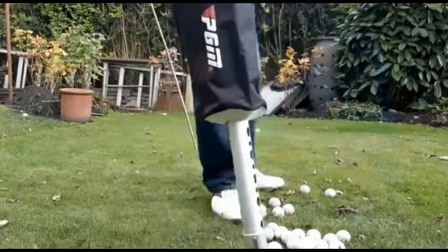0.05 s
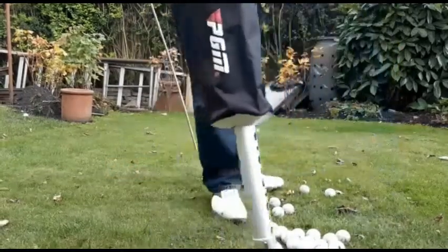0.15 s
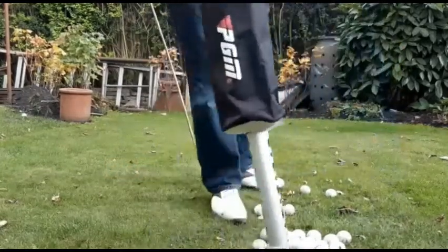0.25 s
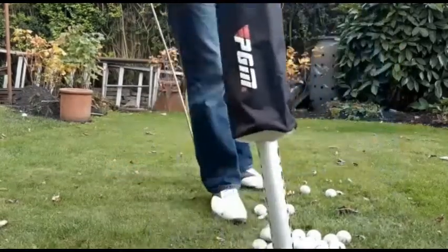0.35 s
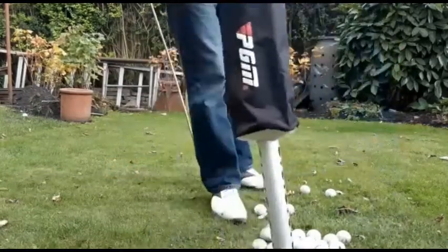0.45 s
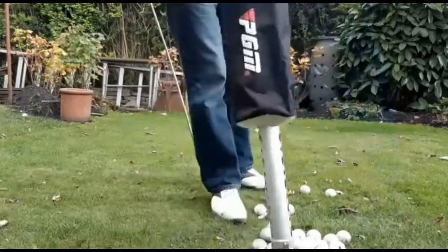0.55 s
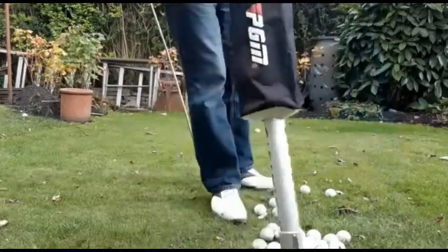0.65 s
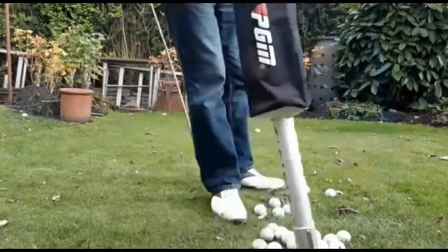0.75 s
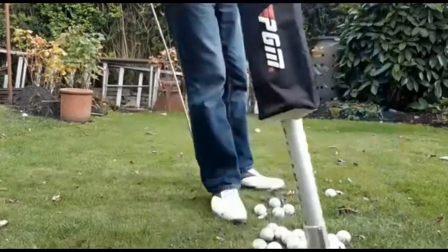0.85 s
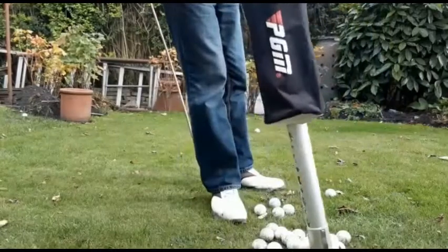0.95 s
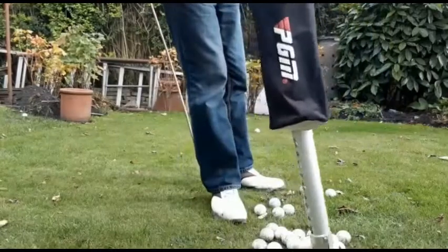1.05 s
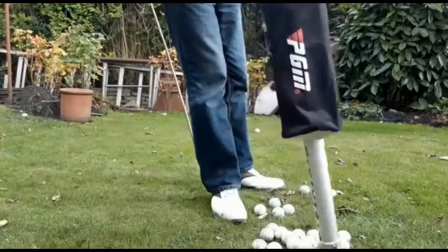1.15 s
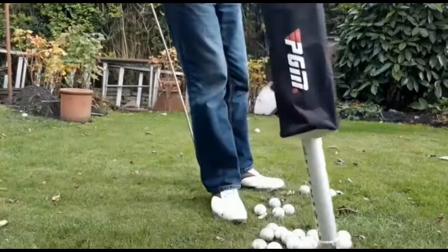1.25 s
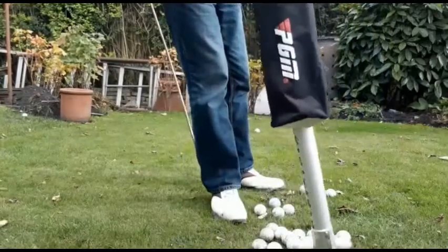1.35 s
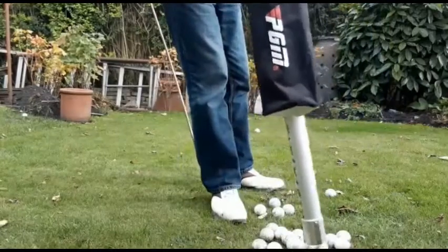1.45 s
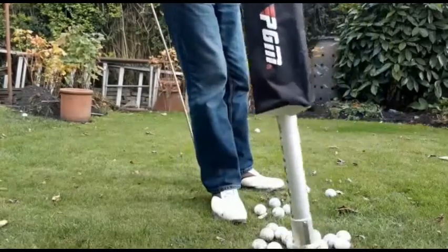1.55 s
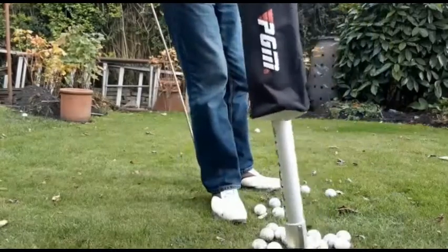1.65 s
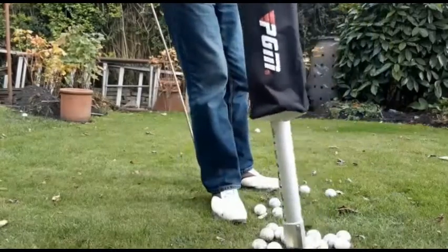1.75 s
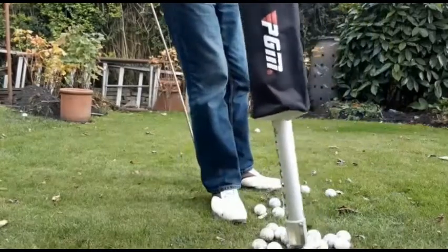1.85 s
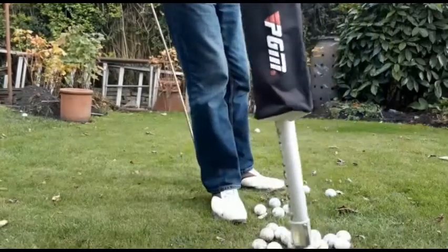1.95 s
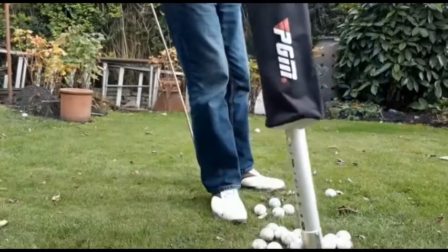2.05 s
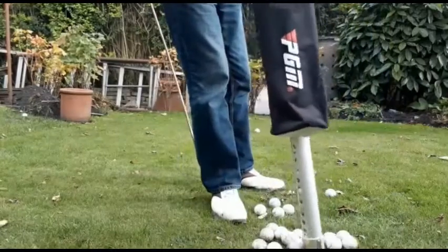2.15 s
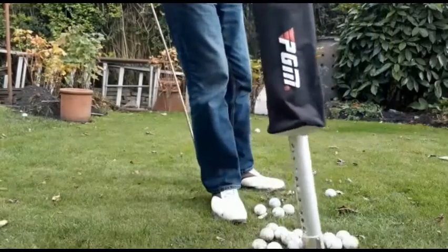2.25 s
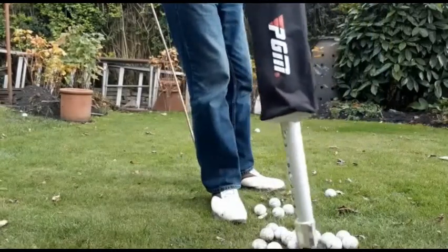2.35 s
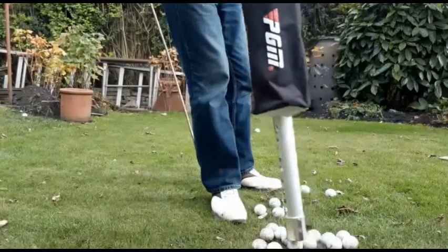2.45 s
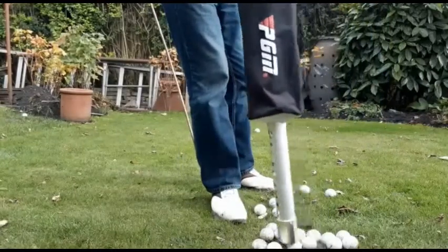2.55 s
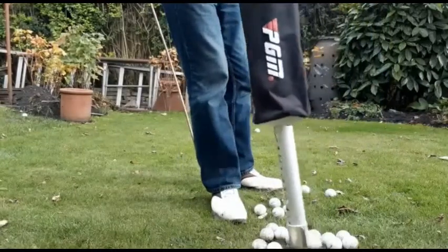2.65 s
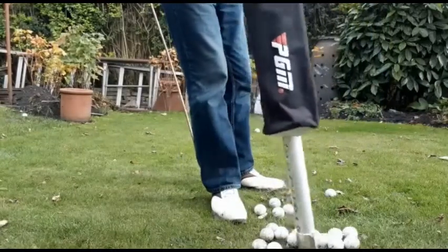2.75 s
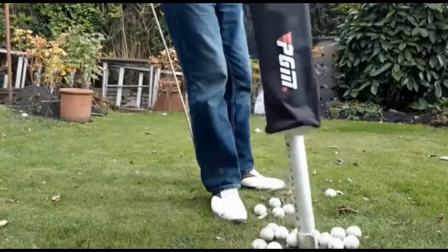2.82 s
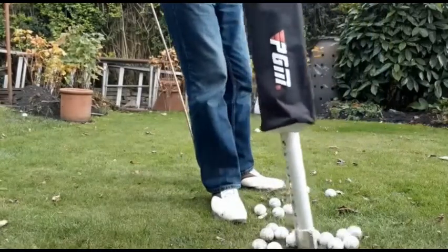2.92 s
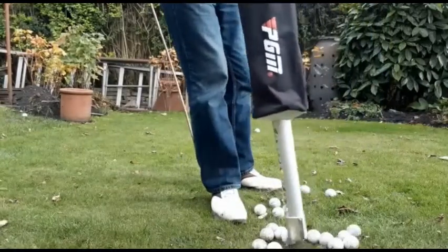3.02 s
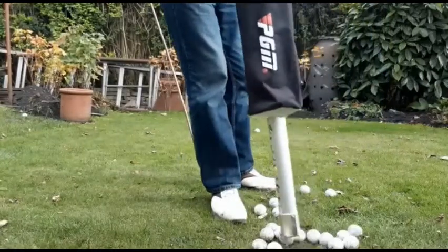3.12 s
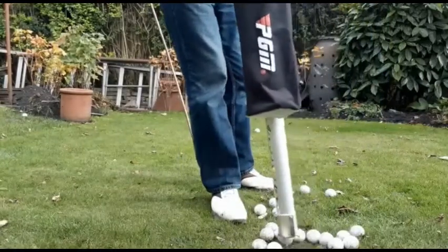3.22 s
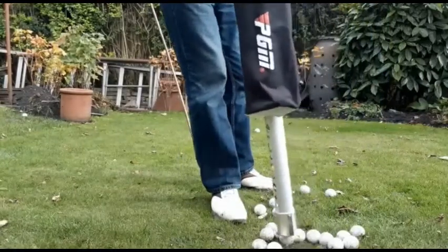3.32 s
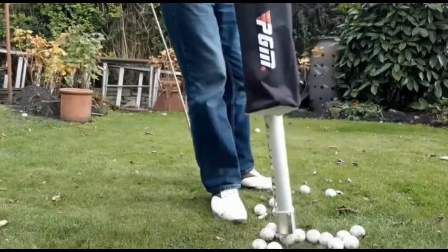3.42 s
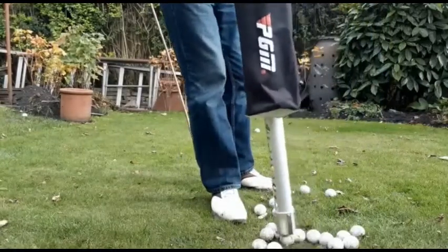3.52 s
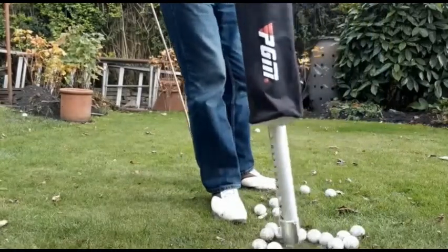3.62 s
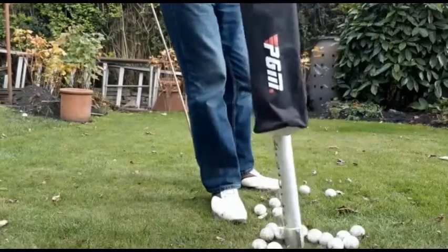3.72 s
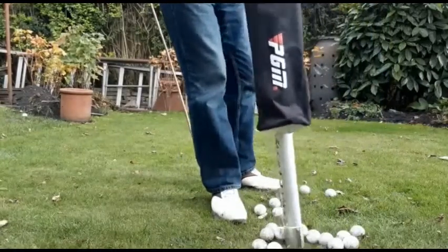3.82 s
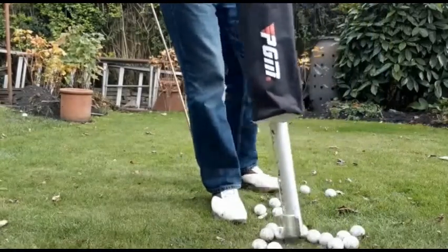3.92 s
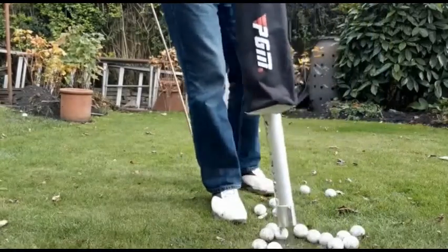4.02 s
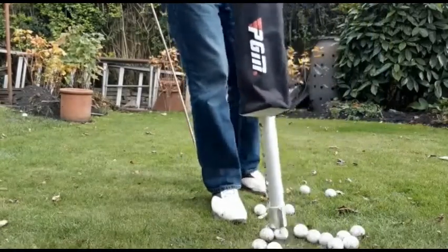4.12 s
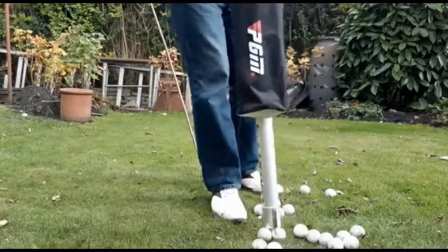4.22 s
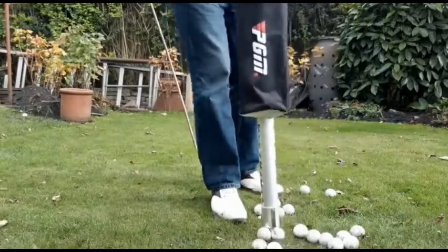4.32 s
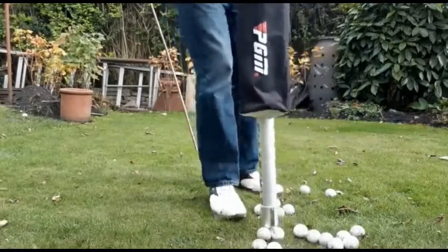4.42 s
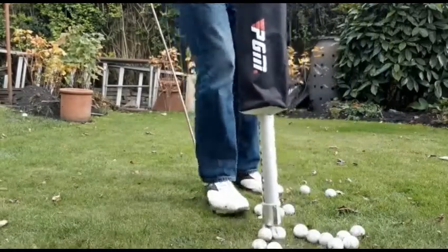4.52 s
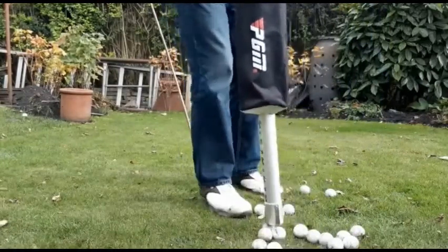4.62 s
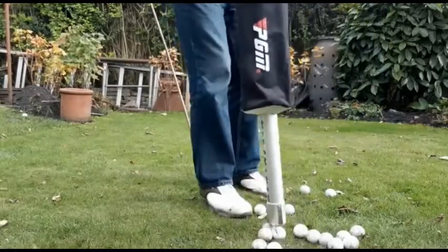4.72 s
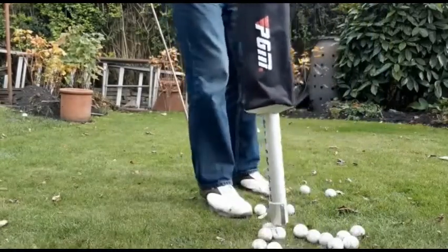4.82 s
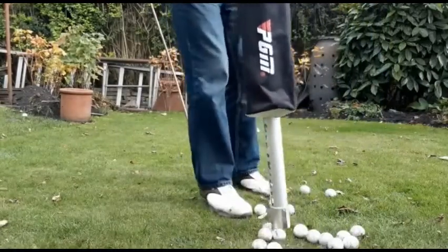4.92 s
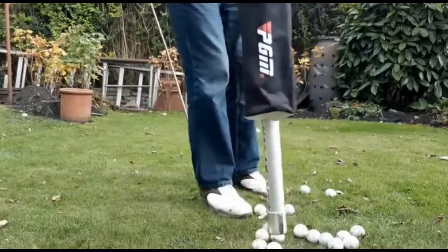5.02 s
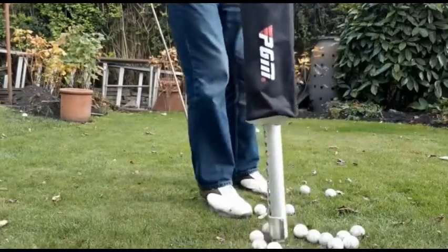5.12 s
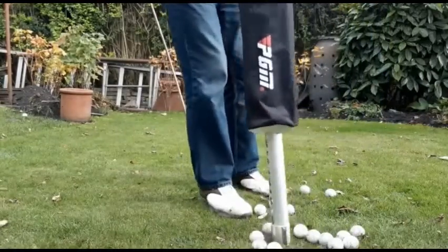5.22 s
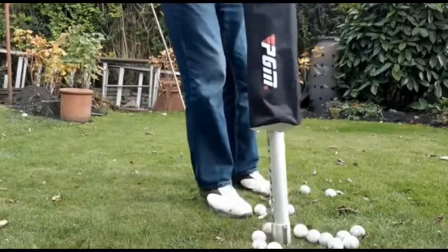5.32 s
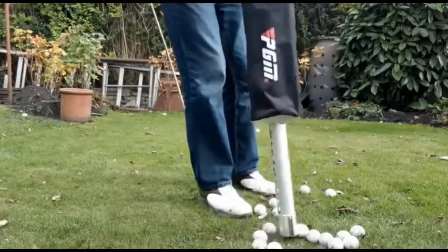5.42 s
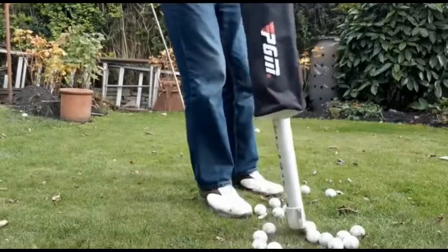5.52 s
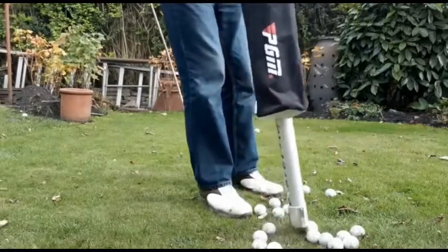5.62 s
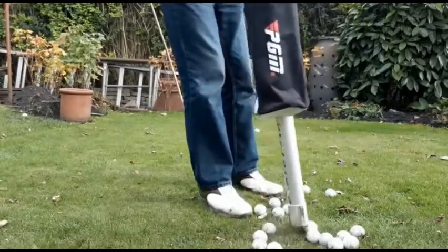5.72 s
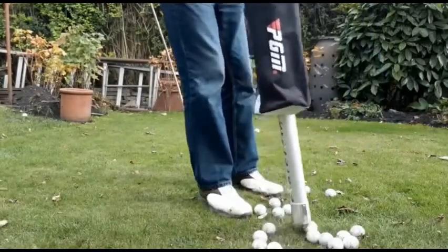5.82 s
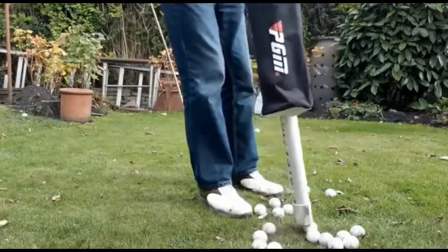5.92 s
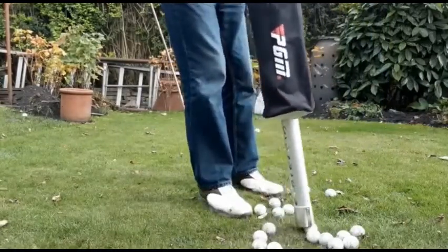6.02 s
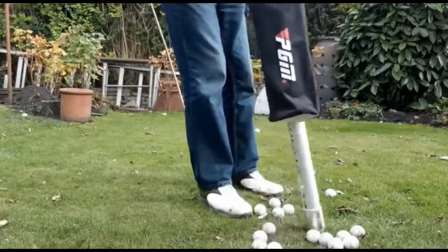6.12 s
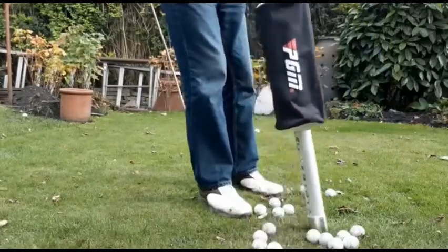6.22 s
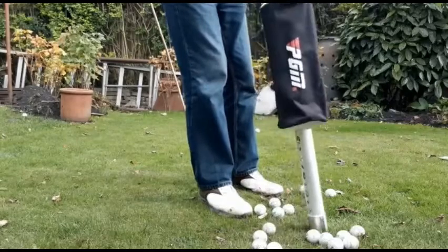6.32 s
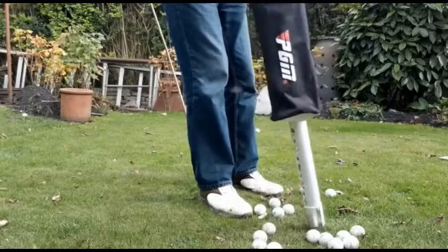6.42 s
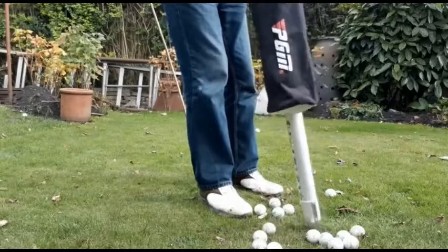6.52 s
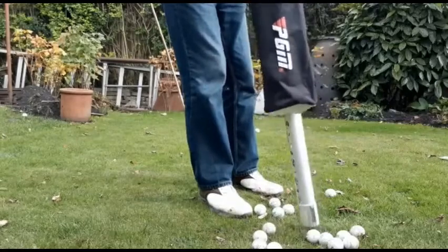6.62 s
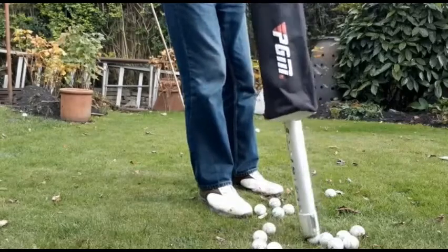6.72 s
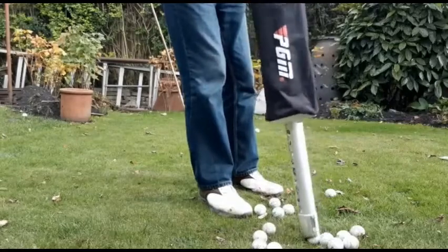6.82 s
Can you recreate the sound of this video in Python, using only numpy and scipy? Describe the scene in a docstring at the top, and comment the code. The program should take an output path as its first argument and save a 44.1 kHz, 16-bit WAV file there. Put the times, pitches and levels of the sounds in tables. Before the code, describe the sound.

Golf balls clack and scrape one after another into a thin metal tube pressed down on a lawn, over faint rumble, hum and hiss.

```python
"""Picking up golf balls with a tube

A thin metal tube is pressed over golf balls on a lawn, a few steps from a camera with two microphone ports.
Each ball knocks the rim, scrapes past spring clips, snaps in and rattles the stack above; the wall rings.
Knocks are short noise bursts with decaying tones; scrapes are ticks and rubbing through shared resonances.
Soft turf thuds and a garden echo join in. Far traffic, a low mains-like hum and garden hiss lie underneath.
"""
import sys
import numpy as np
from scipy import signal
from scipy.fft import rfft, irfft, next_fast_len
from scipy.io import wavfile
from scipy.ndimage import uniform_filter1d, map_coordinates

SR = 44100
rng = np.random.default_rng(int(sys.argv[2]) if len(sys.argv) > 2 else 0)


def put_to_file(sound):
    """Save the sound as 16-bit audio at rate SR, in the file named by the first command-line argument."""
    columns = np.atleast_2d(sound).T  # one column per channel
    safe = np.clip(columns, -1, 1)
    whole_steps = np.round(safe * 32767)
    wavfile.write(sys.argv[1], SR, whole_steps.astype(np.int16))


N = 302517  # length in samples

# Background levels. Each row: time in seconds, then relative levels of rumble, murmur and hiss in dB.
AIR_LEVELS = [(0, -56, -56, -78.5), (.8, -56.5, -58.5, -75), (1.9, -60.5, -56.5, -81),
              (2.5, -51.5, -57.5, -76.5), (3.1, -57.5, -60.5, -78), (3.5, -58, -63.5, -83),
              (4, -51, -59.5, -75), (4.5, -57.5, -58.5, -75.5), (4.95, -51.5, -61, -79),
              (5.6, -58, -58, -73), (5.95, -50, -61, -73), (6.45, -50, -56.5, -67.5),
              (6.86, -47.5, -66, -75)]
# Colours of the three background noises. Each row: frequency in Hz, relative level in dB.
RUMBLE_COLOUR = [(12, -42.5), (20, -20.5), (46, -1), (87, -1), (123, -3.5), (203, -12), (228, -15.5),
                 (400, -29), (520, -58.5), (880, -120)]
MURMUR_COLOUR = [(130, -29), (220, -9), (286, -0.5), (429, -13.5), (458, -12), (872, -8), (1030, -11),
                 (1630, -13), (3000, -37.5), (3900, -60.5), (6600, -120)]
HISS_COLOUR = [(1290, -34), (2200, -8), (2930, -6.5), (3640, -5.5), (3920, -6.5), (7350, -9), (9380, -17.5),
               (15100, -20), (16300, -10.5)]
# How alike the background is left and right. Each row: frequency in Hz, likeness from -1 to 1.
STEREO_LIKENESS = [(30, .22), (60, .4), (110, .7), (200, 0.92), (330, .7), (640, -0.35), (1400, -.5),
                   (3100, 0.093), (7000, -0.21), (15000, -0.033)]
# The upper hum line before its wobble. Each row: time in seconds, level in dB.
UPPER_HUM = [(0, -53.5), (.7, -59.5), (1.4, -59), (1.7, -73), (2.2, -52), (2.9, -58), (3.5, -70.5),
             (5.6, -60.5), (6.86, -69)]
# How long the garden echoes. Each row: frequency in Hz, time to fade by 60 dB in seconds.
GARDEN_FADE = [(200, 0.25), (2000, 0.12), (10000, 0.18)]
# The tube's foot landing on turf. Each row: start in seconds, level in dB, pitch in Hz,
# time to fade by 60 dB in seconds.
TURF_THUDS = [(.378, -28, 116, 0.18), (1.161, -26, 95, 0.12), (2.133, -28.5, 90, 0.11),
              (3.755, -25.5, 86.6, .09), (5.224, -23.5, 105.2, 0.134), (6.215, -29, 89, 0.099),
              (6.529, -16.5, 101.4, 0.057)]
# Knocks of ball on rim, clip or ball. Each row: start in seconds, relative level in dB, clack pitch in Hz,
# low body within the knock in dB, hardness in dB (harder is brighter).
BALL_KNOCKS = [(.123, -35, 1540, 1.5, -5), (0.186, -34.5, 1430, 6, 14.5), (.224, -23.5, 1465, -24, 7.5),
               (.252, -19, 1170, -7, -1), (0.281, -25.5, 1025, -25, -5), (.361, -16.5, 1150, -34, 0.5),
               (.367, -13.5, 1043, -32, 7.5), (.392, -20, 1114, -14, -7.5), (.429, -26, 1045, -21, -3),
               (0.488, -38, 1340, -21, -11.5), (.58, -44, 1500, -11, 3.5), (.969, -42.5, 1323, -3.5, -5.5),
               (.986, -40, 1500, 8.5, 0), (1.058, -22, 1358, -28, -7.5), (1.074, -20, 1500, -29, -6),
               (1.084, -15, 1039, -6, -4), (1.127, -16, 1562, -8, 6), (1.138, -12.5, 1100, -7, 16.5),
               (1.146, -7, 3200, -8, 9), (1.346, -41.5, 1047, -19.5, -1.5),
               (1.699, -43.5, 1420, -15.5, -11.5), (1.834, -38.5, 812, -4.5, -10.5),
               (2.026, -28.5, 4030, -25, -15), (2.042, -24, 1570, -18, -2), (2.061, -16, 1610, -18, 7.5),
               (2.081, -18, 1647, -16, -2), (2.108, -25.5, 1357, 5.5, 3.5), (2.122, -13, 1018, -7, 13),
               (2.202, -33.5, 1098, 1, -1.5), (2.559, -36, 1396, 8.5, 1.5), (2.571, -27.5, 1539, 5, 6),
               (2.641, -38, 1540, -3, 6.5), (2.678, -20, 2970, -20, 7), (2.685, -13.5, 2745, -27, 16),
               (2.741, -15, 1605, -28, 2), (2.756, -19.5, 998, -17, 23.5), (2.844, -23.5, 1530, -5.5, -9.5),
               (2.88, -34.5, 1060, -21, 0), (2.923, -48.5, 1510, -21, -9), (2.98, -37.5, 1084, -3, -7.5),
               (3.068, -46.5, 1450, 4, -2.5), (3.561, -43, 1458, -8, 6), (3.588, -29.5, 1580, -21, -14),
               (3.612, -17, 1476, -10.5, -4.5), (3.637, -21, 1253, -26, 3), (3.654, -17, 1660, -30, -3),
               (3.712, -20, 1355, -20, 3.5), (3.738, -13, 1000, -13, -3), (3.764, -6, 1334, -7.5, -11),
               (3.95, -41.5, 1709, -0.5, -19.5), (4.157, -33, 1284, -21, -10), (4.162, -36, 1475, 2.5, -3),
               (4.385, -35, 1286, -7.5, -12), (4.498, -41.5, 890, -18, -22.5), (4.554, -41, 1120, 3, -8.5),
               (5.017, -28, 1406, -3.5, 1), (5.089, -32.5, 1530, -3, 3), (5.122, -22, 1610, -3, -3.5),
               (5.179, -31, 2835, 9, 0.5), (5.212, -14, 1614, -10, -2), (5.228, -13.5, 2900, -5, 0),
               (5.248, -17, 1100, -4.5, 0), (5.322, -33.5, 1470, -15, -1), (5.401, -40.5, 3470, -10, 1.5),
               (5.448, -32.5, 1350, -6, 2.5), (6.114, -30, 2926, -27, -6), (6.125, -35.5, 2816, -13, -8),
               (6.157, -26, 1580, -14, 0), (6.183, -16, 3040, -4, -4), (6.204, -10, 1635, -5, -5),
               (6.289, -27.5, 2820, 4.5, -2), (6.465, -40.5, 1570, -1, -5), (6.529, -17, 2700, -10, 8),
               (6.562, -31, 1110, -22, 4), (6.636, -50, 810, -17, 6), (6.677, -42, 1140, -2, -6),
               (6.717, -21, 1257, -8.5, -11.5), (6.754, -25, 3460, -10, -3.5), (6.778, -23, 1520, -2.5, 3),
               (6.806, -27, 1590, -25, 6), (6.851, -28.5, 1367, -2, 2.5)]
# Presses over a ball. Each row: first touch in seconds, ball grips the clips in seconds, relative slide
# level in dB, snap in seconds, relative snap level in dB, fade in dB per second, relative treble in dB.
BALL_PRESSES = [(0.177, 0.229, -33, 0.37, -15.5, 190, -15), (0.97, 1.064, -33, 1.132, -17, 169.5, -14),
                (2.02, 2.045, -28.5, 2.111, -19.5, 190, -20),
                (2.561, 2.684, -27, 2.755, -18.5, 150.5, -13.5), (3.558, 3.613, -30, 3.742, -19, 202, -16),
                (4.993, 5.097, -34, 5.22, -15.5, 200, -18.5),
                (6.088, 6.125, -35.5, 6.207, -13.5, 201.5, -17),
                (6.528, 6.527, -36.5, 6.55, -32.5, 200, -17.5), (6.719, 6.73, -37.5, 6.8, -33.5, 60, -16.5)]
# Damped resonances of balls, clips and the air in the tube, from low to high.
# Each row: frequency in Hz, width in Hz, relative level in dB.
LOW_RESONANCES = [(270, 130, -3), (416, 77, 2.5), (534, 183, -0.5)]
MIDDLE_RESONANCES = [(1050, 170, 0), (1340, 170, -3), (1580, 150, 0)]
UPPER_RESONANCES = [(2150, 450, -7), (2900, 330, 0), (3550, 260, -3), (4150, 500, -3)]
TREBLE_RESONANCES = [(5050, 3000, -3), (7500, 1900, 1), (9260, 2000, -7), (13100, 3300, -5)]
# Two families of tube wall modes, long-lasting and bright; a knock wakes them at different strengths.
# Each row: frequency in Hz, relative level in dB, undamped time to fade by 60 dB in seconds.
LONG_MODES = [(1039, 0, .22), (1351, -13, .2), (1570, -13, .15), (5203, -15, .26)]
BRIGHT_MODES = [(2810, 0, .17), (2950, 1, .14), (3085, -6, .15), (3548, -12, .08)]
# How far the left port leads the right. Each row: frequency in Hz, lead in radians.
PORT_LEADS = [(100, 1.5), (1000, -0.6), (3000, -0.85), (5500, -1.5), (16000, -1.7)]

HUM_HZ, HUM_CLIMB_HZ_PER_S, LOWER_LINE_DB = 196.8, .9, -59.5  # centres of the hum's wobbles
ECHO_FROM_HZ = 700  # the garden returns little bass
FIRST_BALL_S = .7  # from here on, balls sit in the tube and damp its wall
HELD_DB_PER_STEP = -1.5  # balls mute the higher long modes; one step is the lowest mode's frequency
UPPER_DB, TREBLE_DB, BRIGHT_DB = -4.5, -20, -19  # relative levels in a knock of hardness 0
UPPER_SHARE, BRIGHT_SHARE = .7, .4  # of the hardness that each follows
BURST_S, BURST_DOUBLES_DB = .06, 20  # 60 dB fade of a -22.5 dB knock; 20 dB fainter lasts twice as long
TREBLE_FASTER = 1.2  # a knock's treble, like its upper band, dies sooner
CLICK_DB, CLICK_S = 8, .002  # hard first contact over a firm burst, and its 60 dB fade time
TOUCH_DB, GRIP_S = -48, .03  # relative scrape level at first touch; seconds it takes to grip
SURGE_S, DROP_S, DROP_DB = .035, .027, -8.5  # the rush before the snap and the quick drop after it
LOW_RUB_GROWS, TREBLE_RUB_GROWS = .81, 1.153  # the low rub swings less than the scrape, the treble more
EMPTY_SINGS_DB, FULL_SINGS_DB = -6.5, -16  # drive of the long modes by the scrape, before and after a ball
TOP_HZ = 16000  # the camera's band limit


def amp(db):
    """Turn decibels into a plain multiplier."""
    return 10 ** (np.asarray(db) / 20)


def unit(x):
    """Scale a sound to an rms (average strength) of 1."""
    return x / np.sqrt(np.mean(x ** 2) + 1e-20)


def along(points, hz):
    """Read a curve of (Hz, value) points on a log frequency axis."""
    f, v = np.transpose(points)
    return np.interp(np.log(hz + 1), np.log(f + 1), v)


def curves(rows):
    """Give one value per sample for each column after the time."""
    s, *columns = np.transpose(rows)
    return [np.interp(np.arange(N) / SR, s, column) for column in columns]


def wobble(rate):
    """Draw a smooth random curve with this many random points a second."""
    points = rng.standard_normal(int(N * rate / SR) + 4)
    return map_coordinates(points, [np.arange(N) * rate / SR])


def filtered(x, response):
    """Multiply the spectrum of a sound by a complex response."""
    m = next_fast_len(N + SR // 2)
    return irfft(rfft(x, m) * response(np.fft.rfftfreq(m, 1 / SR)), m)[..., :N]


def resonant(x, peaks, dull_hz):
    """Pass a sound through resonances, duller above dull_hz; white noise keeps its level."""
    def shape(f):
        total = 0
        for k, (centre, width, db) in enumerate(peaks):
            peak = 1j * f * width / (centre * centre - f * f + 1j * f * width)
            total = total + (-1) ** k * amp(db) * peak  # neighbours have opposite signs
        return total / (1 + 1j * f / dull_hz) ** 2

    white_gain = np.sqrt(np.mean(abs(shape(np.arange(SR // 2))) ** 2))
    return filtered(x, shape) / white_gain


def rush(spectrum, patchy_db):
    """Make stereo noise of rms 1, with patches of random gain in time and frequency."""
    z = signal.stft(rng.standard_normal((2, N)), nperseg=512)[2]
    field = rng.standard_normal(z.shape[1:])
    field = uniform_filter1d(uniform_filter1d(field, 6, 0), 14, 1)
    pair = signal.istft(z * amp(patchy_db * unit(field)), nperseg=512)[1][:, :N]

    def colour_and_width(hz):
        turn = np.arccos(np.clip(along(STEREO_LIKENESS, hz), -1, 1)) / 2
        return amp(along(spectrum, hz)) * [np.cos(turn), np.sin(turn)]

    mid, side = filtered(pair, colour_and_width)
    return unit(np.array([mid + side, mid - side]))


def air():
    """Background noise: rumble comes in lumps, murmur swells slowly with only faint patches, and the hiss is
    the patchiest."""
    rumble_db, murmur_db, hiss_db = curves(AIR_LEVELS)
    lumps = amp(5 + 1.5 * wobble(7))
    rumble = amp(rumble_db) * lumps * rush(RUMBLE_COLOUR, patchy_db=-2.0)
    murmur = amp(murmur_db + 3.5 + .9 * wobble(3.9)) * rush(MURMUR_COLOUR, patchy_db=.5)
    hiss = amp(hiss_db + 6.5) * rush(HISS_COLOUR, patchy_db=-3.0)
    return rumble + murmur + hiss


def hum():
    """Two unsteady sine lines an octave apart; the upper one comes and goes."""
    upper_db, = curves(UPPER_HUM)
    pitch = HUM_HZ + HUM_CLIMB_HZ_PER_S * np.arange(N) / SR + 1.5 * wobble(17)
    turn = np.pi * np.cumsum(pitch) / SR  # phase of the lower line, at half the pitch
    upper = amp(upper_db + 1.2 * wobble(8)) * np.sin(2 * turn)
    lower = amp(LOWER_LINE_DB + 3.1 * wobble(24)) * np.sin(turn)
    return np.sqrt(2) * (upper + lower)


def garden(x):
    """Fence, shed and hedge answer with a noise-like echo; each frequency dies at its own speed."""
    hz, t, z = signal.stft(rng.standard_normal((2, SR // 2)), SR, nperseg=256)
    fade = amp(-60 * t / along(GARDEN_FADE, hz)[:, None])
    tail = signal.istft(z * fade, SR, nperseg=256)[1]
    tail = tail / np.linalg.norm(tail[0])
    delayed = np.pad(x, (300, 0))[None]  # in samples
    return signal.fftconvolve(delayed, tail, axes=1)[:, :N]


def thuds():
    """Soft low pushes into the turf, as fading sines that reach the two ports out of step."""
    out, t = np.zeros((2, N + SR)), np.arange(SR // 4) / SR
    for s, db, hz, t60 in TURF_THUDS:
        i = round(s * SR)
        swing = np.sin(2 * np.pi * hz * t + np.array([[-.35], [.35]]))
        out[:, i:i + len(t)] += amp(db - 60 * t / t60) * swing * (1 - np.exp(-t / .00032))
    return out[:, :N]


def ring(modes, t, draw, damping):
    """Sum fading wall modes of random strength and phase; touching balls damp and detune them."""
    total = 0
    for (hz, db, t60), (strength, phase, detune) in zip(modes, draw):
        mode_hz = hz * (1 + .012 * (damping - 1) * detune)
        fade = amp(db + 3.5 * strength - 60 * damping * t / t60)
        total = total + fade * np.sin(2 * np.pi * mode_hz * t + phase)
    return total


def knocks():
    """Each knock is a dying four-band burst of force, a clack at its own pitch and a ring of the wall."""
    force, tones, t = np.zeros((4, N + SR)), np.zeros(N + SR), np.arange(SR // 3) / SR
    n_long, lowest_hz = len(LONG_MODES), LONG_MODES[0][0]
    draws = rng.standard_normal((len(BALL_KNOCKS), n_long + len(BRIGHT_MODES), 3))
    speeds = np.array([[1], [1], [1.2], [TREBLE_FASTER]])  # rows: low, middle, upper, treble
    for (s, db, hz, low_db, hard_db), draw in zip(BALL_KNOCKS, draws):
        i = round(s * SR)
        rise = .00067 * amp(-.55 * min(db + 26.5, 0))  # faint touches swell more slowly
        t60 = BURST_S * 2 ** (-(db + 22.5) / BURST_DOUBLES_DB)
        envelope = amp(-60 * t / t60 * speeds) * (1 - np.exp(-t / rise))
        shove = envelope * rng.standard_normal((4, len(t)))
        bands_db = np.array([[low_db], [-4], [UPPER_DB + UPPER_SHARE * hard_db], [TREBLE_DB + hard_db]])
        click = 1 + amp(CLICK_DB + .4 * min(db + 26, 0) - 60 * t / CLICK_S)
        force[:, i:i + len(t)] += amp(db - 7.0 + bands_db) * shove * click

        b, a = signal.iirpeak(hz, 11, SR)  # the two touching bodies favour one pitch
        clack = signal.lfilter(b, a, shove[1])
        tones[i:i + len(t)] += amp(db - 4.0) * clack / abs(clack).max()

        held_db, damping = (0, 1) if s < FIRST_BALL_S else (-11, 1.6)
        # firm clacks near the lowest mode wake the long ring
        long_db = held_db - 3 + .6 * min(db + 26, 0) - 30 * abs(np.log2(hz / lowest_hz))
        mute_db = (s > FIRST_BALL_S) * HELD_DB_PER_STEP
        long_modes = [(f, level + mute_db * (f / lowest_hz - 1), life) for f, level, life in LONG_MODES]
        bright_db = BRIGHT_DB + BRIGHT_SHARE * hard_db
        wall = amp(long_db) * ring(long_modes, t, draw, damping)
        wall = wall + amp(bright_db) * ring(BRIGHT_MODES, t, draw[n_long:], np.sqrt(damping))
        tones[i:i + len(t)] += amp(db) * wall * (1 - np.exp(-t / (rise + .003)))
    return force[:, :N], tones[:N]


def scrape():
    """The dimpled ball slips past the clips in uneven ticks over a rub: it grips, slides, snaps in, fades."""
    ticks = (rng.random(N) < 450 / SR) * amp(3 * np.minimum(rng.exponential(size=N), 3))  # 450 a second
    smooth_rub = np.array([[.6], [.6], [.7], [1.2]])  # the treble rubs smoothest
    grip = unit(signal.lfilter([1], [1, -.97], ticks)) + smooth_rub  # ticks die in milliseconds
    level, t = np.zeros((4, N)), np.arange(N) / SR
    for touch, grips, slide_db, snap, snap_db, fade_db, treble_db in BALL_PRESSES:
        dropped, dropped_db = snap + DROP_S, snap_db + DROP_DB
        times = [touch, grips - GRIP_S, grips, snap - SURGE_S, snap, dropped, dropped + 1]
        times = np.maximum.accumulate(times)  # keeps very short presses in order
        levels = [TOUCH_DB, TOUCH_DB, slide_db, slide_db, snap_db, dropped_db, dropped_db - fade_db]
        db = np.interp(t, times, levels)
        low_db = -32 + LOW_RUB_GROWS * (db + 31)
        high_db = treble_db - 31 + TREBLE_RUB_GROWS * (db + 29.5)
        level += (t > touch) * amp([low_db, db, db - 2.5, high_db])
    tone = amp(3.67 * np.array([wobble(45) for _ in level]))  # the colour shifts as the contact moves
    return amp(-6.5) * tone * level * unit(grip * rng.standard_normal((4, N)))


def narrow(modes):
    """Turn each mode's fade time into the width of a resonance that fades as slowly."""
    return [(hz, np.log(1000) / np.pi / t60, db) for hz, db, t60 in modes]


def tube():
    """Knocks and scrape drive the same resonances; gives direct sound and treble scattered to each port."""
    force, tones = knocks()
    rub = scrape()
    low, middle, upper, treble = force + rub
    treble = amp(6.0) * treble  # short hard contacts carry far into the treble
    body = resonant(low, LOW_RESONANCES, dull_hz=930)
    body = body + resonant(middle, MIDDLE_RESONANCES, dull_hz=2360)
    body = body + resonant(upper, UPPER_RESONANCES, dull_hz=5200)
    body = body + resonant(treble, TREBLE_RESONANCES, dull_hz=30000)

    # the scrape keeps the wall sounding
    long_db = np.where(np.arange(N) / SR < FIRST_BALL_S, EMPTY_SINGS_DB, FULL_SINGS_DB)
    singing = amp(-8.5) * resonant(rub[2], narrow(BRIGHT_MODES), dull_hz=6000)
    singing = singing + resonant(amp(long_db) * rub[1], narrow(LONG_MODES), dull_hz=9000)

    paths = rng.choice([-1, 1], (2, N))  # grass and legs scramble short waves differently for each port
    scattered = amp(-5) * resonant(paths * treble, TREBLE_RESONANCES, dull_hz=30000)
    return body + tones + singing, scattered


def scene():
    """Mix the tube and thuds at the two ports with the garden echo, hum and air."""
    direct, scattered = tube()
    leads = lambda hz: np.exp(np.outer([.5j, -.5j], along(PORT_LEADS, hz)))
    ports = filtered(direct, leads) + scattered + thuds()
    bass_shy = lambda hz: 1j * hz / (ECHO_FROM_HZ + 1j * hz)
    echo = amp(-11.0) * filtered(garden(direct), bass_shy)
    balance = amp([[-.6], [.6]])  # left a little softer than right
    return ports * balance + echo + hum() + air()


def record(dry):
    """The camera cuts the deepest bass, rounds off the loudest peaks and stops at its band limit."""
    bass_cut = lambda hz: (1j * hz / 40 / (1 + 1j * hz / 40)) ** 3
    x = filtered(dry, bass_cut)
    x = x / (1 + abs(x / .8) ** 4) ** (1 / 4)
    return filtered(x, lambda hz: hz < TOP_HZ)


dry = scene()
out = record(dry)
put_to_file(out)
```